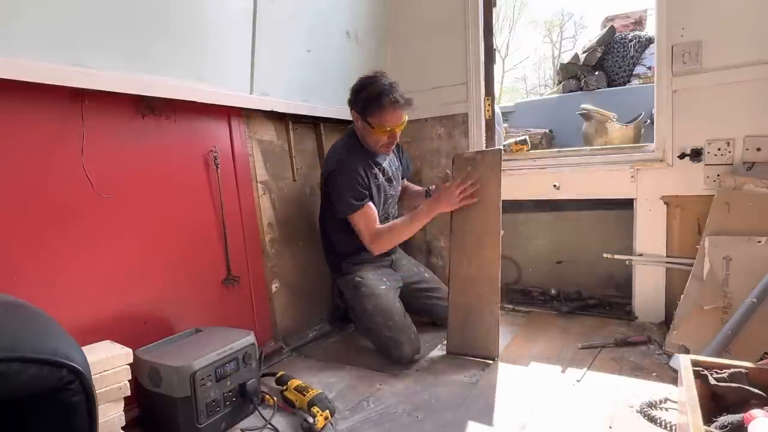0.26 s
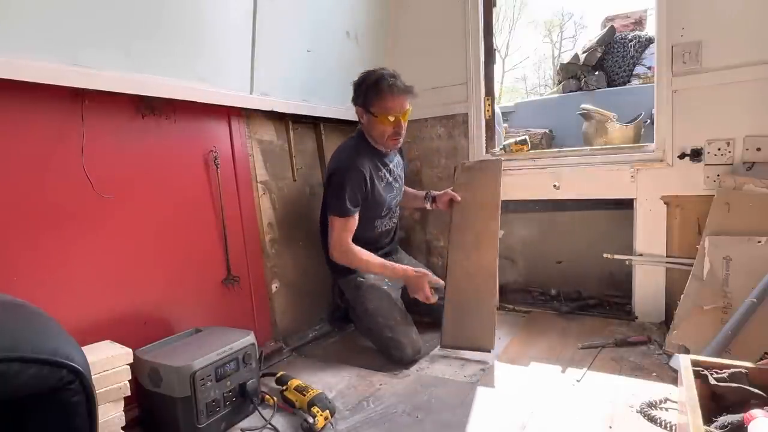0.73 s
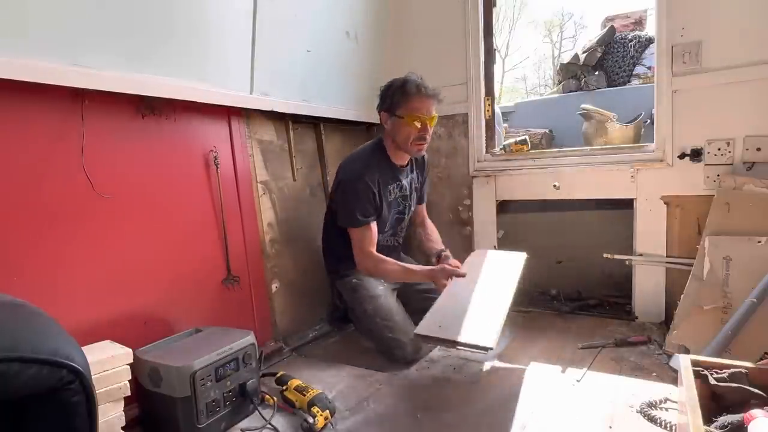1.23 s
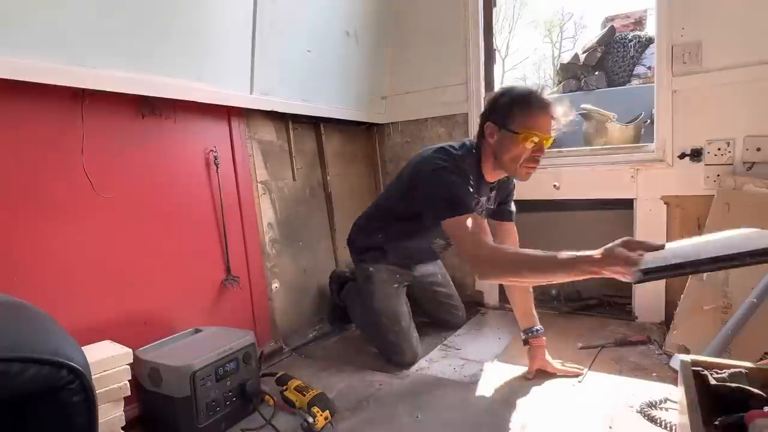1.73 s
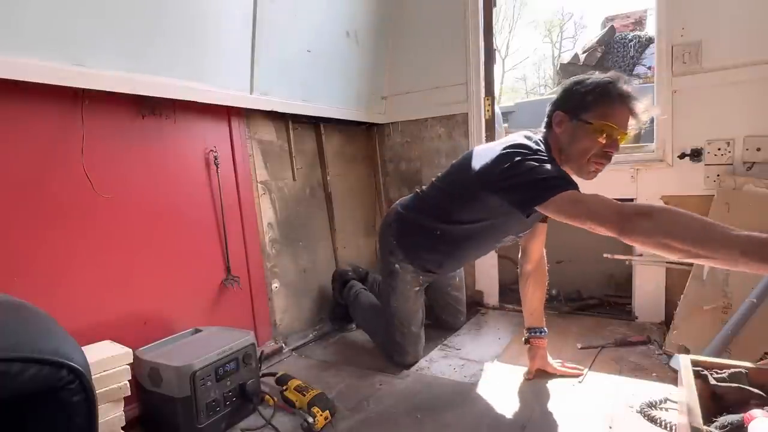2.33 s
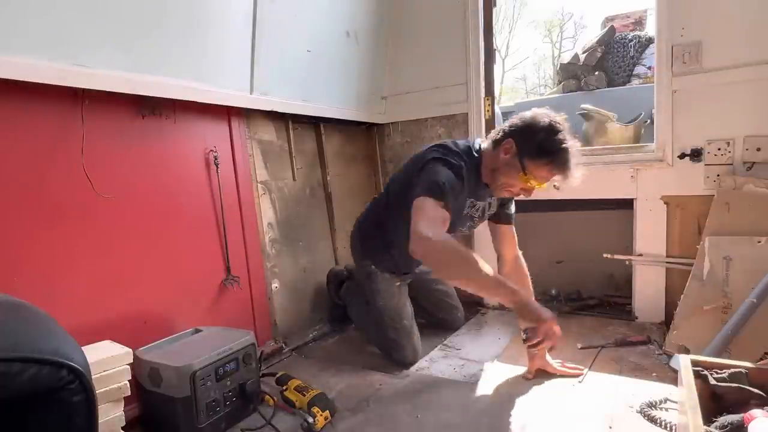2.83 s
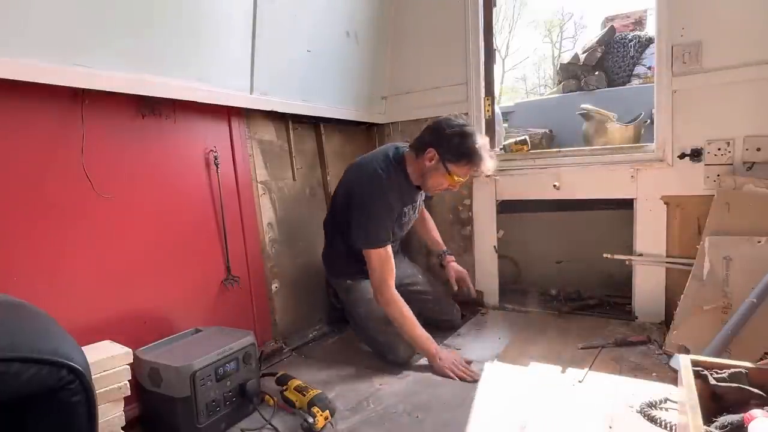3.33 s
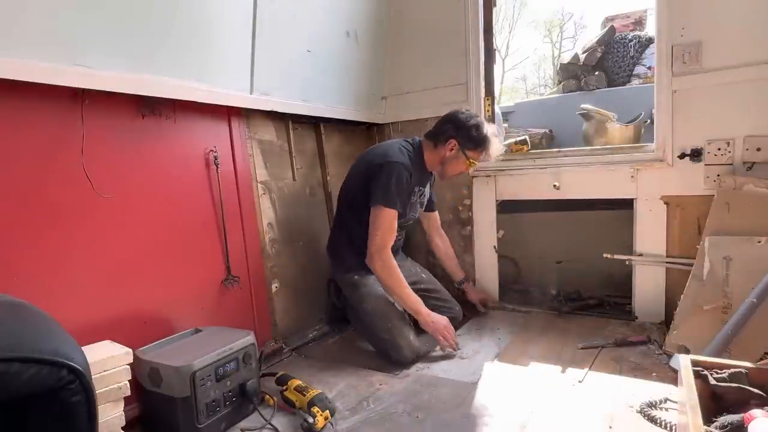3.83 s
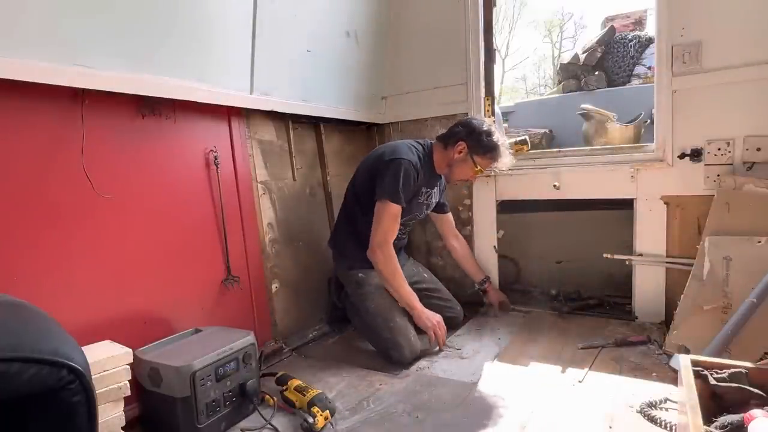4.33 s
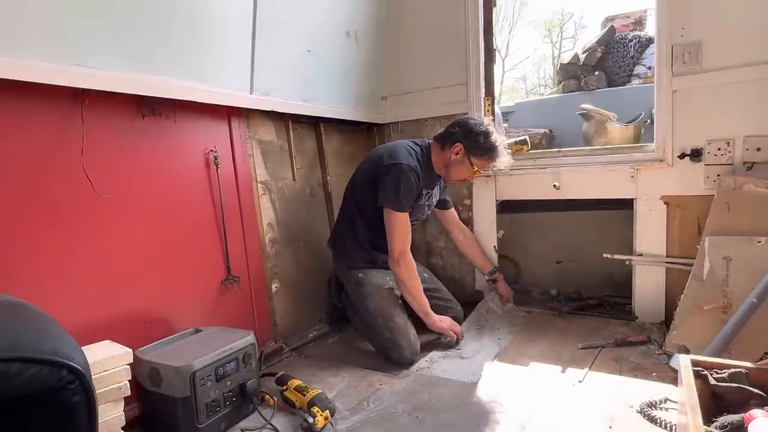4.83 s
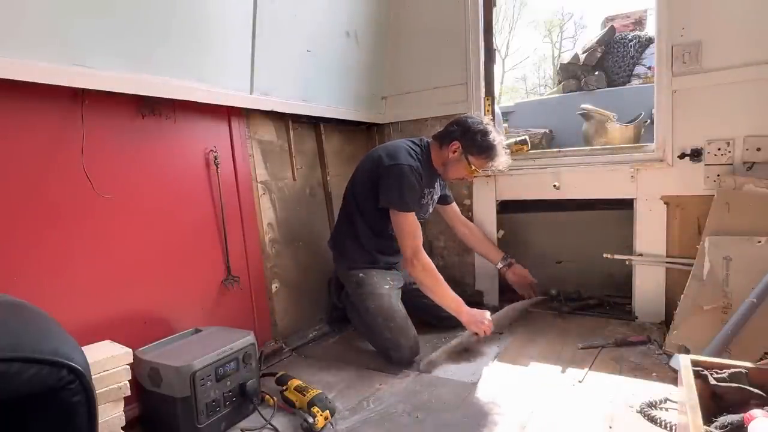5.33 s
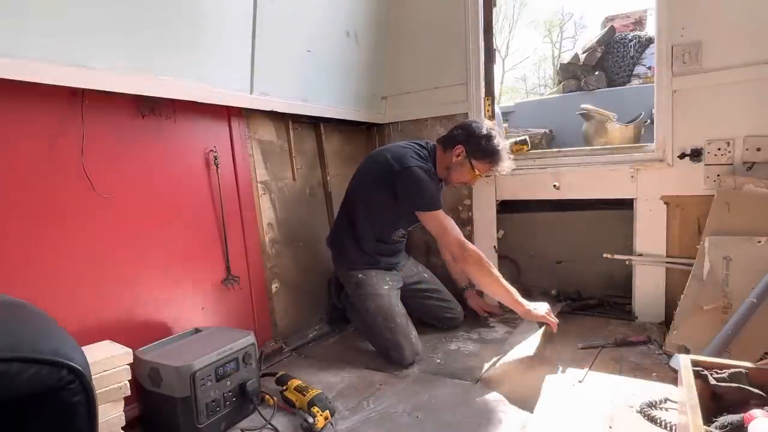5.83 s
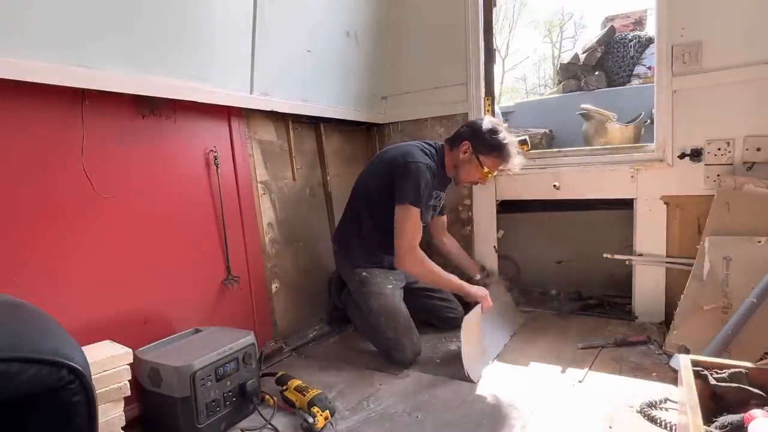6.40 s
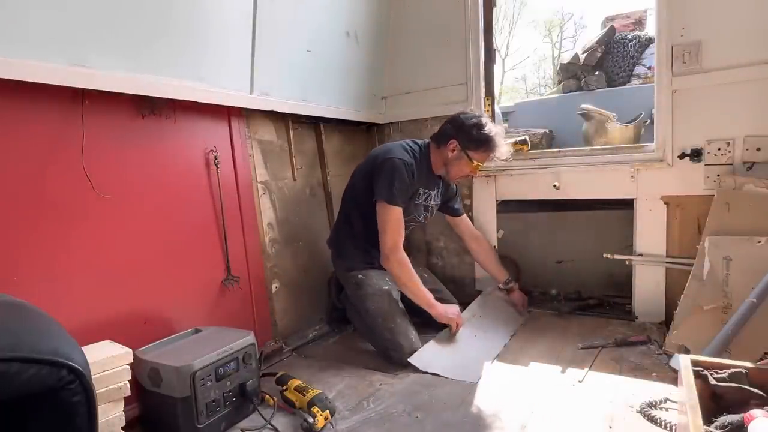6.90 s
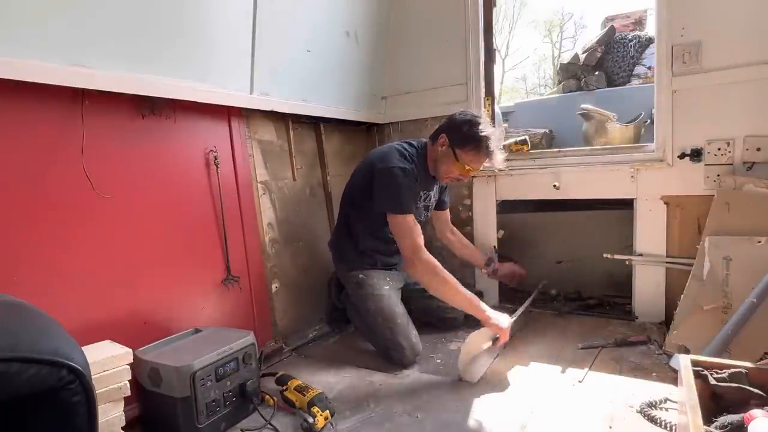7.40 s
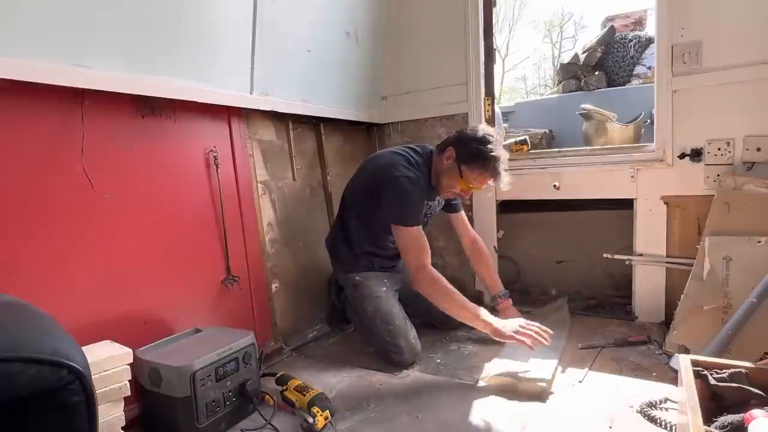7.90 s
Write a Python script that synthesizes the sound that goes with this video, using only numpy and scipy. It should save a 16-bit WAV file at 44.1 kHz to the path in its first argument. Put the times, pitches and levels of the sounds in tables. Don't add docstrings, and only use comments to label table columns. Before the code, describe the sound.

Wooden board thumps on end, is brushed by hand, then clatters hollowly onto a stack before another board is scraped and prised loose.

```python
import sys
import numpy as np
from scipy import signal
from scipy.fft import rfft, irfft
from scipy.io import wavfile
from scipy.ndimage import uniform_filter1d

SR = 44100
rng = np.random.default_rng(int(sys.argv[2]) if len(sys.argv) > 2 else 0)


def makeup_ratio(level_db):
    decades = np.asarray(level_db, float) / 20
    return 10 ** decades


def store_wav(level_fs):
    pcm = np.round(np.clip(np.atleast_2d(level_fs), -1, 1) * 32767)
    wavfile.write(sys.argv[1], SR, pcm.T.astype(np.int16))


N = 359415


def evened(x):
    return x / np.sqrt(np.mean(x ** 2) + 1e-20)


def read(points, hz):
    f, value = np.transpose(points)
    return np.interp(np.log(hz + 1), np.log(f + 1), value)


def add(mix, s, sound):
    part = mix[max(round(s * SR), 0):][:len(sound)]
    part += sound[:len(part)]


def late(x, count):
    return np.r_[np.zeros(count), x][:N]


def per_sample(slow):
    return np.interp(np.arange(N) * 1000 / SR, np.arange(len(slow)), slow)


def colour(x, points, fall_db=-16.0):
    hz = np.fft.rfftfreq(len(x), 1 / SR)
    body = [p for p in points if p[1] > -60 and p[0] < 9900]
    octaves_above = np.log2(np.maximum(hz / body[-1][0], 1))
    gain = makeup_ratio(read(body, hz) + fall_db * octaves_above)
    low_cut = (hz / body[0][0]).clip(0, 1) ** 2
    return evened(irfft(rfft(x) * gain * low_cut, len(x)))


def ring(hz, db, t60, rise_ms=0.1, size=16000):
    t = np.arange(size) / SR
    decay = makeup_ratio(db - 60 * t / max(t60, .02))
    swell = 1 - np.exp(-1000 * t / rise_ms)
    return decay * np.sin(2 * np.pi * hz * t) * swell


def strokes(rows):
    roundness = 1.244
    bite_per_s = 1.24
    s, db, rise, fall = np.transpose(rows)[:4, :, None]
    t = np.arange(0, N / SR + .01, .001) - s
    far = np.where(t < 0, -t / np.maximum(rise, .003), t / np.maximum(fall, .003))
    bend = roundness + bite_per_s * rise * (t < 0)
    return makeup_ratio(np.maximum(db - 20 * far ** bend, -130)) ** 2


def grit(per_s, spread_db, hiss, wobble_db, wobble_ms):
    sizes = makeup_ratio(spread_db * rng.exponential(1, N).clip(0, 3.2))
    grains = sizes * (rng.random(N) < per_s / SR)
    mix = evened(grains * rng.standard_normal(N)) + hiss * rng.standard_normal(N)
    span = max(int(wobble_ms * SR / 1000), 2)
    tremble = evened(uniform_filter1d(uniform_filter1d(rng.standard_normal(N), span), span))
    return mix * makeup_ratio(wobble_db * tremble)


def flexing(x, depth_db):
    z = signal.stft(x, nperseg=256)[2]
    patches = evened(uniform_filter1d(uniform_filter1d(rng.standard_normal(z.shape), 3, 0), 12, 1))
    return evened(signal.istft(z * makeup_ratio(depth_db * patches), nperseg=256)[1][:N])


def singing(rub, rows, width_hz):
    power = strokes(rows)
    hz = per_sample(np.transpose(rows)[4] @ power / power.sum(0))
    turn = np.exp(2j * np.pi * np.cumsum(hz) / SR)
    r = np.exp(-np.pi * width_hz / SR)
    note = signal.lfilter([1 - r], [1, -r], rub / turn)
    note = signal.lfilter([1 - r], [1, -r], note)
    return per_sample(np.sqrt(power.sum(0))) * evened((turn * note).real)


def ports(z):
    # (frequency [Hz], likeness [0-1])
    likeness = [(60, 1), (150, 1), (300, 0.43), (600, 0.032), (1500, 0.024), (8000, 0.017)]
    same = read(likeness, np.linspace(0, SR / 2, z.shape[1])).clip(0, 1)[:, None]
    return np.array([z[0], same * z[0] + np.sqrt(1 - same ** 2) * z[1]])


def air():
    # (frequency [Hz], level [dB per Hz])
    wash = [(18, -36), (30, 1), (49, -8.5), (71, -8.5), (115, -4), (196, -22), (302, -14), (537, -21),
            (809, -17.5), (980, -13.5), (2270, -31), (4910, -36), (9400, -38.5)]
    z = signal.stft(np.array([colour(v, wash) for v in rng.standard_normal((2, N))]), nperseg=1024)[2]
    patches = evened(uniform_filter1d(uniform_filter1d(rng.standard_normal(z.shape[1:]), 10, 0), 8, 1))
    z = ports(z) * makeup_ratio(2.2 * patches)
    return makeup_ratio(-56.5) * signal.istft(z, nperseg=1024)[1][:, :N]


def rumble():
    # (frequency [Hz], width [Hz], level [dB])
    plates = [(58.8, 13, -1), (64, 4.1, -11), (92.9, 4.8, -2.5)]
    # (time [s], level [dB])
    weight = [(0.0, -20.5), (.12, -42), (.45, -45), (.85, -60.5), (1.1, -54.5), (1.55, -63), (1.69, -26),
              (1.85, -48), (3.25, -58.5), (3.4, -51.5), (4.3, -57), (4.4, -43.5), (4.55, -52.5),
              (6.4, -56.5), (6.85, -46), (7.4, -55), (7.629, -45.5), (8.15, -55.5)]
    hz = np.fft.rfftfreq(N, 1 / SR)
    gain = sum(makeup_ratio(db) / (1 + (2 * (hz - f) / w) ** 2) for f, w, db in plates)
    murmur = evened(irfft(rfft(rng.standard_normal(N)) * gain, N))
    return makeup_ratio(np.interp(np.arange(N) / SR, *np.transpose(weight))) * murmur


def thumps():
    # (time [s], blow level [dB], floor plate frequency [Hz], hull plate level [dB])
    blows = [(0.001, -14.5, 118.6, -26), (0.01, -12, 114.3, -40), (0.047, -9.5, 93.7, -43),
             (0.525, -31, 112.7, -53), (0.596, -29.5, 95.4, -56), (1.619, -38.5, 126, -52),
             (1.674, -18.5, 87.4, -35), (1.699, -32, 90.7, -27), (1.729, -23, 94.1, -37),
             (1.796, -29, 89.7, -32), (2.286, -24.5, 131, -49), (2.498, -17.5, 100.8, -53),
             (2.555, -25.5, 93.6, -50), (3.323, -36, 116.7, -40), (4.322, -37.5, 101, -42),
             (4.598, -54, 90, -43), (5.12, -46, 125.6, -64), (5.403, -32.5, 107, -62),
             (5.527, -32, 96, -58), (5.614, -32.5, 97.5, -53), (5.776, -39, 90, -57),
             (6.499, -65, 83.4, -38), (6.618, -70, 84.5, -37), (6.738, -66, 86.1, -43),
             (7.349, -42.5, 100.5, -64), (7.547, -35, 89.5, -58), (7.801, -39, 98.4, -58),
             (8.137, -36, 119, -59)]
    floor_t60_s, hull_t60_s, hull_hz, contact_ms = 0.37, 0.31, 58, 3.13
    out = np.zeros(N)
    push = np.hanning(int(contact_ms * SR / 700))
    for s, blow_db, hz, hull_db in blows:
        modes = ring(hz, blow_db, floor_t60_s) + ring(hull_hz, hull_db, hull_t60_s)
        add(out, s, signal.oaconvolve(modes, push / push.sum()))
    return out


def brushing():
    # (frequency [Hz], level [dB per Hz])
    skin = [(120, -45), (200, -33), (477, -26.5), (579, -12), (691, -31), (1140, -20.5), (1600, -14),
            (2390, -6.5), (5520, -2), (9400, -5.5)]
    # (peak time [s], level [dB], rise [s], fall [s])
    hand_strokes = [(0.1, -48, 0.35, 0.16), (0.25, -60, .2, 0.68), (.252, -59, .005, .05),
                    (.435, -37, 0.0054, 0.072), (0.495, -33, 0.12, 0.14), (0.8, -52.5, 0.0079, 0.043),
                    (1.152, -59, .005, .1), (1.2, -49, 0.033, 0.087), (1.67, -59.5, 0.21, 0.17),
                    (2.085, -71, .01, 1), (2.495, -49.5, .01, 0.21), (2.8, -53.5, 0.12, 0.16),
                    (3.297, -44, 0.0046, 0.52), (3.47, -21.5, 0.097, 0.11),
                    (4.08, -44, 0.084, 0.014), (4.03, -48, .005, .04), (4.145, -37, .006, 0.036),
                      (4.17, -44, 0.04, 0.22), (4.345, -45.5, .005, 0.088), (4.4, -50, 0.073, 0.12),
                      (4.547, -42.5, 0.0068, 0.045), (4.62, -51.5, .1, .1), (4.69, -34.5, 0.026, 0.019),
                      (4.87, -46, 0.2, 0.039), (5.019, -43.5, 0.066, 0.16), (5.31, -48, 0.47, 0.091),
                      (5.41, -26, 0.027, 0.033), (5.54, -35.5, 0.044, .25), (5.66, -30, 0.24, 0.15),
                      (5.84, -44.5, .06, 0.037), (5.76, -33, 0.18, 0.087), (6.19, -52.5, 0.2, 0.8),
                      (6.37, -46, 0.1, 0.055), (6.469, -40, 0.035, 0.021), (6.63, -49, 0.22, 0.034),
                      (6.93, -49, 0.3, 0.8), (7.15, -43.5, 0.3, 0.24), (7.39, -51, 0.21, 1),
                      (7.544, -36, 0.014, 0.016), (7.83, -37, 0.1, 0.053), (8.12, -48, 0.093, 0.6)]
    level = per_sample(np.sqrt(strokes(hand_strokes).sum(0)))
    return level * colour(grit(6000, 1.6, 0.47, 3.1, 30), skin, fall_db=1.5)


def dragging():
    # (frequency [Hz], level [dB per Hz])
    light_edge = [(130, -16), (250, -12.5), (400, -5.5), (600, -3), (900, -4), (1300, -8), (2000, -15),
                  (4000, -20.5), (9400, -36)]
    # (frequency [Hz], level [dB per Hz])
    hard_edge = [(200, -6.5), (500, -12.5), (900, -5.5), (1300, 2), (1900, -0.5), (2600, -0.5), (4500, -4),
                 (9400, -13)]
    # (peak time [s], level [dB], rise [s], fall [s], pressure [0-1])
    scuffs = [(0.0, -45.5, .1, 0.26, 0.15), (0.249, -46.5, 0.027, 0.034, 0.7),
              (0.36, -46.5, 0.063, 0.11, 0.83), (0.481, -36, 0.064, 0.044, 1),
              (0.529, -29.5, 0.017, 0.01, 1), (1.198, -37.5, 0.056, 0.022, 0.86),
              (1.32, -59, 0.066, 0.27, 0.6), (1.622, -54, 0.23, 0.37, 0), (2.4, -41.5, 0.38, 0.28, 0.66),
              (2.87, -51.5, 0.19, 0.52, 0.37), (3.35, -40.5, 0.022, 0.13, 0.9),
              (3.47, -32, 0.11, 0.043, 0.92)]
    # (peak time [s], level [dB], rise [s], fall [s], pressure [0-1])
    drags = [(3.965, -49, 0.0073, 0.44, 0.76), (4.159, -39, 0.088, 0.077, 0.78),
             (4.52, -48.5, 0.28, 0.83, 0.97), (4.69, -52, 0.26, 0.12, 0.55), (4.87, -46, 0.13, 0.031, 0.2),
             (4.985, -39.5, 0.03, 0.49, 0.46), (5.25, -39.5, 0.39, 0.067, 0),
             (5.412, -19.5, 0.018, 0.02, 0.4), (5.5, -29.5, 0.11, 0.17, 0.65),
             (5.65, -31, 0.36, 0.43, 0.56), (5.775, -35, 0.25, 0.06, 0.94), (6.37, -46.5, 0.32, 0.23, 0.67),
             (6.62, -42, 0.32, 0.084, 0.42), (6.9, -44.5, 0.21, 1, 1), (7.239, -37, 0.66, 0.18, 0.36),
             (7.545, -37, 0.048, 0.049, 0.83), (7.829, -39, 0.2, 0.21, 0.83), (8.14, -40, 0.11, .5, 0.9)]
    # (peak time [s], level [dB], rise [s], fall [s], frequency [Hz])
    ridges = [(1.2, -45, .02, 0.087, 1052), (2.549, -28.5, 0.046, 0.07, 1125),
              (4.685, -46, 0.0088, 0.04, 620), (5.06, -54.5, 0.036, 0.043, 702),
              (5.15, -52, 0.034, .05, 557), (5.24, -44.5, .05, 0.044, 712),
              (5.378, -36.5, .015, 0.022, 1435), (5.43, -33.5, .04, 0.031, 910),
              (6.37, -48, .05, 0.05, 613), (6.8, -55, 0.1, 0.092, 696), (6.9, -56, 0.091, 0.12, 836),
              (7.01, -42.5, .05, 0.069, 658), (7.15, -47, .04, 0.056, 820), (7.21, -50, 0.049, 0.031, 930),
              (7.27, -43, 0.041, .05, 608), (7.56, -45, .02, 0.062, 1605)]
    # (peak time [s], level [dB], rise [s], fall [s], frequency [Hz])
    surges = [(.5, -46, 0.12, 0.051, 4600), (1.2, -49, 0.051, 0.057, 3200), (1.31, -57, 0.03, 0.033, 3570),
              (4.69, -42, .008, 0.035, 1350), (5.4, -30, .012, 0.028, 700),
              (5.425, -28, 0.015, 0.037, 1210), (5.535, -32.5, .015, 0.04, 2590),
              (5.62, -32, 0.05, .04, 2760), (5.725, -28.5, 0.075, 0.018, 1760),
              (5.765, -30, 0.021, 0.038, 1570), (5.82, -33, .025, 0.029, 1600), (7.05, -45, 0.14, .1, 2180),
              (7.2, -45, 0.14, 0.19, 1950), (7.55, -44, 0.012, 0.057, 350),
              (7.81, -38.5, 0.083, 0.038, 1710), (7.845, -41, .03, 0.052, 1650)]
    power = strokes(scuffs + drags)
    pressure = np.transpose(scuffs + drags)[4].clip(0, 1)
    hard = per_sample(pressure @ power / power.sum(0))
    rub = flexing(grit(1400, 3.4, 0.65, 1.7, 6.0), depth_db=1.5)
    dull = colour(rub, light_edge, fall_db=3.0)
    sharp = colour(rub, hard_edge, fall_db=9.5)
    notes = singing(rub, ridges, width_hz=62) + singing(rub[::-1], surges, width_hz=800)
    return per_sample(np.sqrt(power.sum(0))) * ((1 - hard) * dull + hard * sharp) + notes


def knocks():
    # (frequency [Hz], level [dB], 60 dB decay [s])
    near_end = [(337, 2, 0.28), (381.5, 3, 0.18), (410, 0.5, 0.16), (595, -2, 0.091), (2980, -17, 0.04),
                (750, 0.5, 0.047), (1074, -6, 0.12), (1250, -13.5, 0.084), (1473, -9, 0.13),
                (1890, -14, 0.08), (2240, -29, 0.076)]
    # (frequency [Hz], level [dB], 60 dB decay [s])
    far_end = [(321.5, -0.5, 0.54), (400, -1, 0.082), (516, 2.5, 0.19), (548, -4, 0.28), (660, 2, 0.12),
               (833, -2, 0.11), (1125, -10, 0.37), (1355, -16.5, 0.29), (1750, -17, 0.11),
               (2734, -19.5, 0.28), (3200, -9.5, 0.08)]
    # (frequency [Hz], level [dB], 60 dB decay [s])
    held = [(309, 14.5, 0.082), (426, 15, 0.02), (714, 0, 0.11), (964, 0.5, 0.025), (954, 1, 0.042),
            (1510, -23, 0.017), (1790, 0.5, 0.029)]
    # (frequency [Hz], level [dB per Hz])
    stack_crack = [(250, 2), (500, 8.5), (1000, 11.5), (1600, 8.5), (3000, 2.5), (5500, -12.5),
                   (9400, -20.5)]
    # (frequency [Hz], level [dB per Hz])
    held_crack = [(400, -14), (1000, 7.5), (1500, 1.5), (2600, -3), (5000, -10), (9400, -13.5)]
    landings = (1.9, 2.46, 3.05)
    # (time [s], blow level [dB], lowest mode [Hz], upper modes level [dB], crack level [dB])
    stood = [(0.002, -11, 187, -22.5, -36), (0.013, -16, 145, -30.5, -48), (0.092, -26, 171, -51, -41),
             (0.524, -29.5, 152, -43, -43.5), (1.193, -72, 173, -63, -47.5), (1.579, -55, 152, -55, -59),
             (1.606, -39.5, 209, -56, -48), (1.679, -29.5, 141, -48, -50.5)]
    stacked = [(2.077, -14, 187, -31.5, -36.5), (2.147, -19.5, 179, -40, -44.5),
               (2.174, -34, 174, -41, -66), (2.2728, -15, 244, -5, -22.5), (2.29, -10.5, 154, -12, -35),
               (2.333, -6, 184, -17.5, -32.5), (2.37, -20, 193, -40, -49), (2.409, -27, 177, -45, -48),
               (2.486, -20, 235, -16, -18.5), (2.495, -3, 198, -10.5, -43.5), (2.509, -32, 216, -17, -38),
               (2.554, -22, 144, -39, -39), (2.748, -35.5, 208, -42, -52), (2.843, -47, 206, -55, -53)]
    prised = [(4.072, -39, 173, -52.5, -47), (4.275, -34, 260, -45, -77), (4.297, -28, 153, -49, -74),
              (4.332, -32, 146, -46, -58), (4.4, -39.5, 156, -45.5, -49), (4.679, -46, 170, -48, -34),
              (5.387, -62.5, 158.3, -39.5, -25.5), (5.419, -58, 151, -34, -28.5),
              (5.523, -47, 169, -40, -26), (5.748, -56, 240, -39, -20), (6.351, -41, 226, -49, -40),
              (6.47, -41, 154, -50, -44.5), (7.535, -37, 238, -43, -46), (7.796, -40, 150, -51.5, -43.5)]
    ticks = [
        (2.2705, -50, 200, -36, -27.5),
        (2.4434, -55, 200, -55, -39),
        (3.2967, -55, 201, -68.5, -54.5),
        (5.814, -57, 200, -52.5, -30),
    ]

    out, t = np.zeros(N), np.arange(4096) / SR
    rows = stood + stacked + prised + ticks
    chance = rng.standard_normal((40, 2, len(near_end)))
    splinter = rng.standard_normal((len(chance), len(t)))
    for (s, blow_db, hz, upper_db, crack_db), (spot, tune), noise in zip(rows, chance, splinter):
        damp = 2.05 * (hz / 183) ** 1.5
        add(out, s, ring(hz, blow_db + 3.5, 0.058 / np.sqrt(damp), rise_ms=0.76, size=6000))

        modes = (held, near_end, far_end, held)[np.searchsorted(landings, s)]
        upper = np.zeros(6000)
        for (f, db, t60), a, b in zip(modes, spot, tune):
            mode = ring(f * (1 + 0.0074 * b), db + 0.81 * a, 0.53 * t60 / damp, rise_ms=1.0, size=6000)
            upper += mode * np.sign(a * b)
        chatter = noise[:900] * makeup_ratio(-8.0 - 60 * t[:900] / 0.021) * (abs(noise[900:1800]) > 2.4)
        chatter[0] = 1
        add(out, s, makeup_ratio(upper_db - 2) * signal.oaconvolve(upper, chatter))

        burst = makeup_ratio(-60 * t / 0.026) + makeup_ratio(-5.5 - 60 * t * damp / 0.082)
        crack = colour(noise, held_crack if modes is held else stack_crack, fall_db=-20.0)
        add(out, s, makeup_ratio(crack_db + 4.0) * crack * burst)
    return out


def cabin(palm, wood, wet_db, drift_s=.12):
    # (frequency [Hz], 60 dB decay [s])
    decay = [(60, 0.55), (300, 0.22), (1000, 0.29), (3000, 0.26), (8000, 0.32), (15000, 0.13)]
    # (frequency [Hz], level [dB])
    reflected = [(100, -3.5), (300, -0.5), (1000, 2.5), (4000, 2), (12000, -1.5)]
    out = np.array([late(palm, count=5) + late(wood, count=20), palm + wood])
    turn = np.pi * np.arange(N) / SR / drift_s / 3
    wall_gain = makeup_ratio(read(reflected, np.fft.rfftfreq(512, 1 / SR)))
    wall = np.fft.fftshift(irfft(wall_gain)) * np.hanning(512)
    for k in range(3):
        taps = np.zeros((2, 14000))
        at = np.arange(100, 13980, 20) + rng.integers(0, 20, (2, 694))
        np.put_along_axis(taps, at, rng.choice([-1., 1.], at.shape), 1)
        hz, t, z = signal.stft(taps, SR, nperseg=512)
        fading = ports(z) * makeup_ratio(-60 * t / read(decay, hz)[:, None])
        tail = signal.istft(fading, SR, nperseg=512)[1]
        tail = tail * makeup_ratio(wet_db) / np.linalg.norm(tail[0])
        tail = signal.oaconvolve(tail, wall[None], "same", axes=1)
        share = np.sqrt(2 / 3) * np.cos(turn + k * np.pi / 3)
        out += signal.oaconvolve((share * (palm + wood))[None], tail, axes=1)[:, :N]
    return out


def scene():
    palm = makeup_ratio(-3.0) * brushing()
    wood = makeup_ratio(-4.5) * dragging() + makeup_ratio(-2.5) * knocks()
    inside = cabin(palm, wood, wet_db=1.53)
    steel = makeup_ratio(2.0) * thumps() + rumble()
    return (inside + np.array([late(steel, count=42), steel]) + air()) * makeup_ratio([[-1.2], [1.1]])


def band_limit(x):
    return signal.sosfilt(signal.butter(12, 15710, fs=SR, output="sos"), x)


def record(dry):
    # (from [Hz], to [Hz], sign of the right channel)
    folded = [(9650, 10350, -1), (11100, 13750, 1), (13900, 17000, -1)]
    low_cut = signal.butter(3, 36, "high", fs=SR, output="sos")
    hz, t, z = signal.stft(signal.sosfilt(low_cut, dry), SR, nperseg=2048)
    top = (abs(z[0, hz > 5000]) ** 2).sum(0)
    steady = np.maximum(np.roll(top, -1) / top, top / np.roll(top, 1)) < 14
    for lo, hi, sign in folded:
        ragged = 130 * rng.standard_normal((2, len(t)))
        inside = steady & (hz[:, None] > lo + ragged[0]) & (hz[:, None] < hi + ragged[1])
        z = np.where(inside, makeup_ratio(-2.5) * np.array([z[0], sign * z[0]]), z)
    z = z * makeup_ratio(-8.0 * (hz[:, None] > 14400) * ~steady) * (hz[:, None] < 15900)
    return band_limit(signal.istft(z, SR, nperseg=2048)[1][:, :N])


dry = scene()
out = record(dry)
store_wav(out)
```